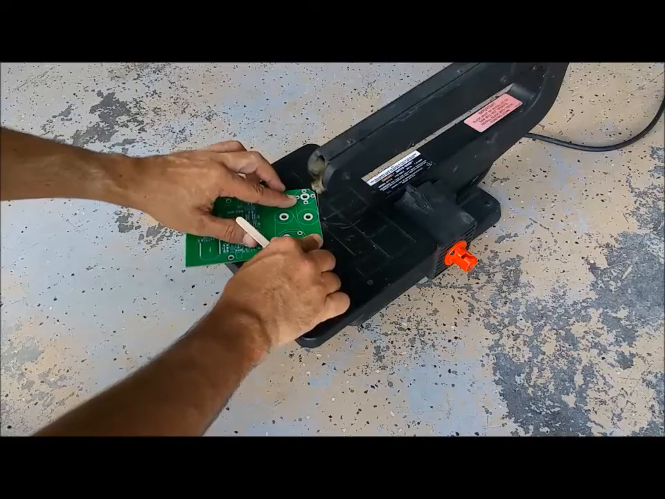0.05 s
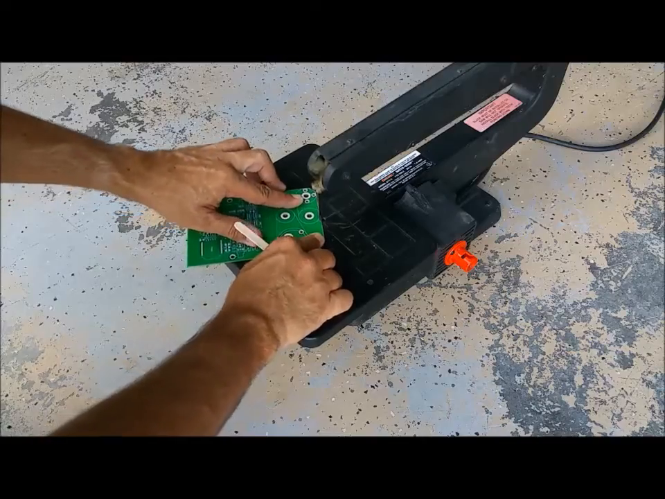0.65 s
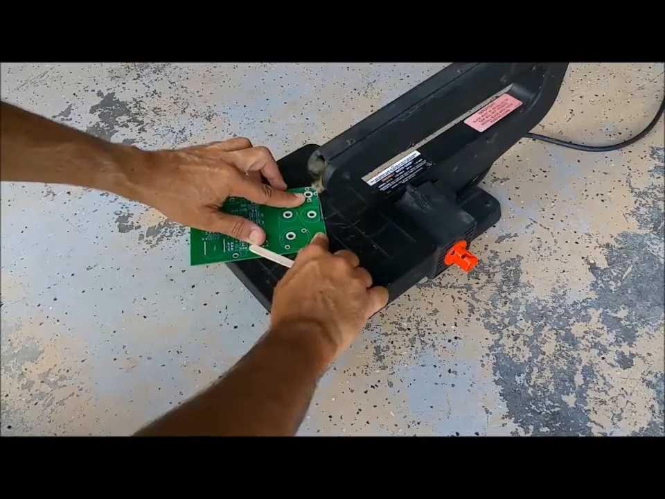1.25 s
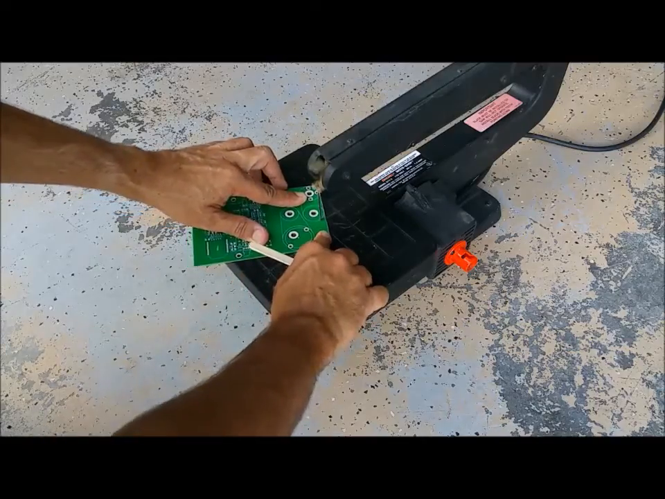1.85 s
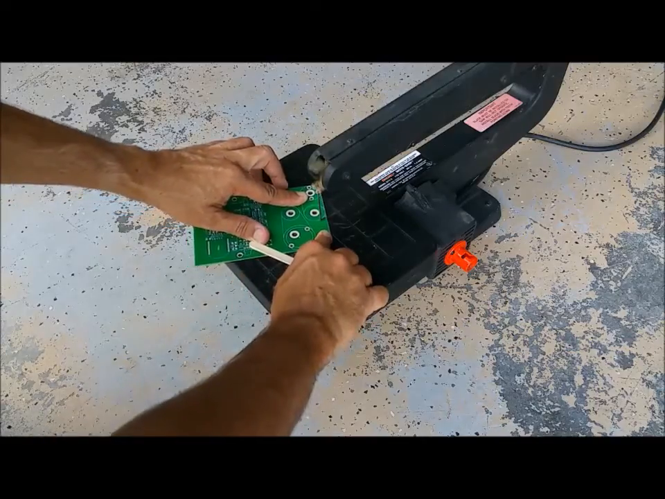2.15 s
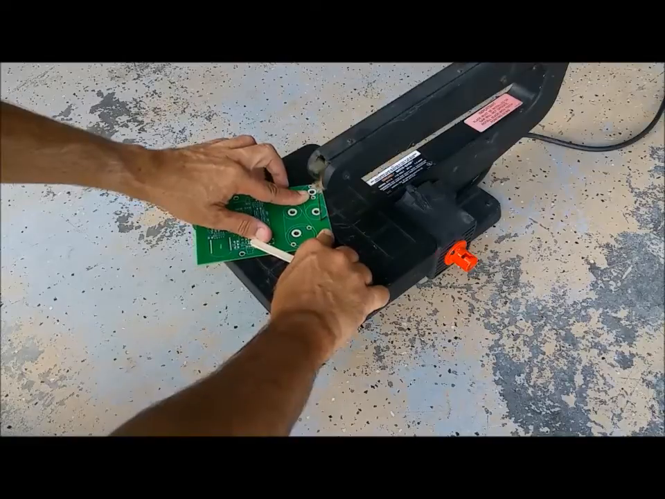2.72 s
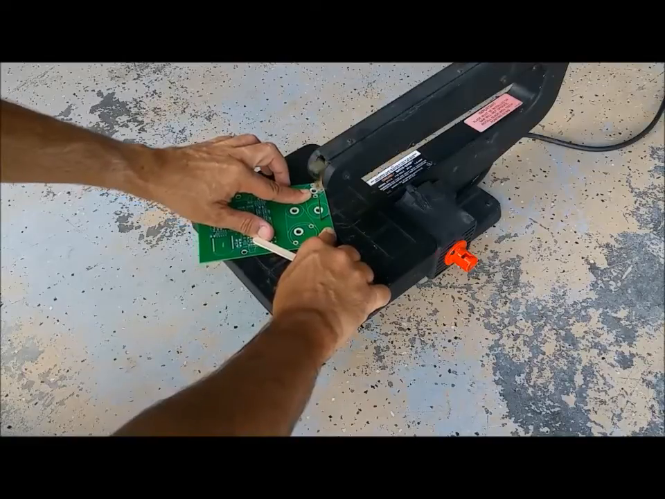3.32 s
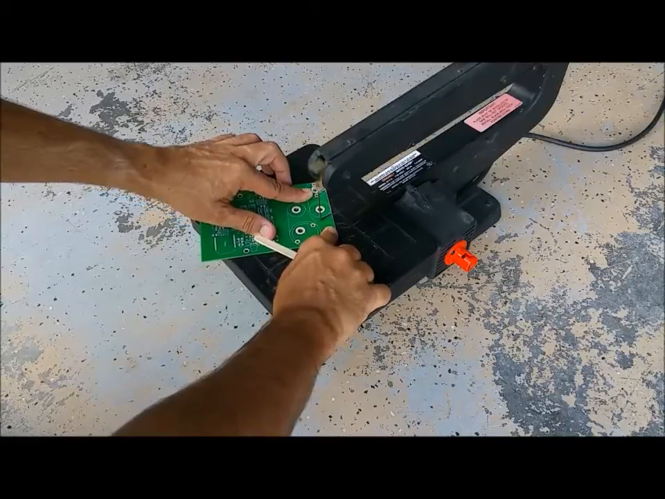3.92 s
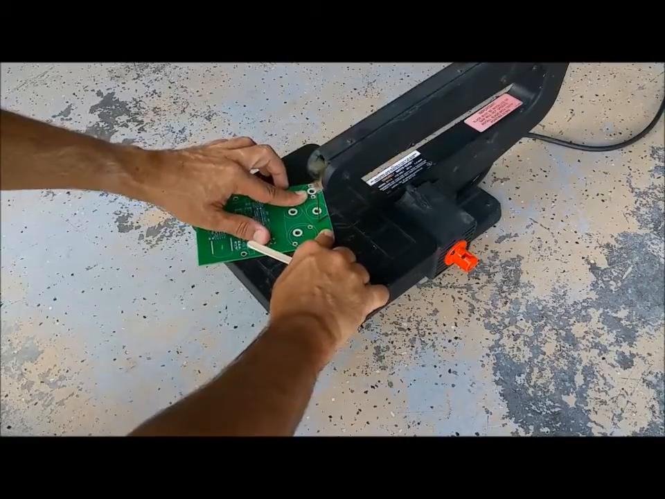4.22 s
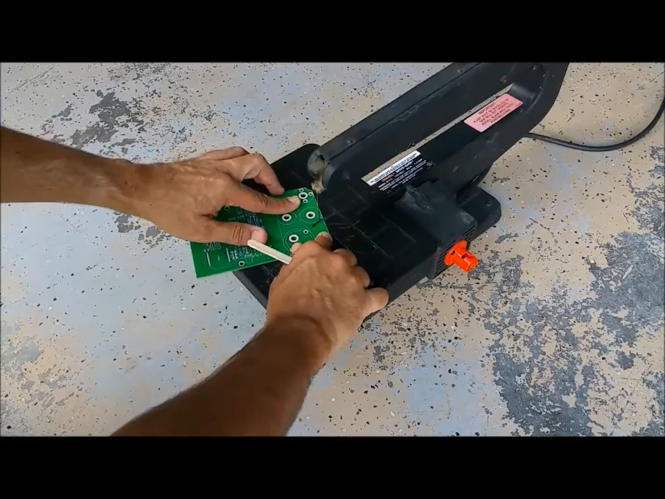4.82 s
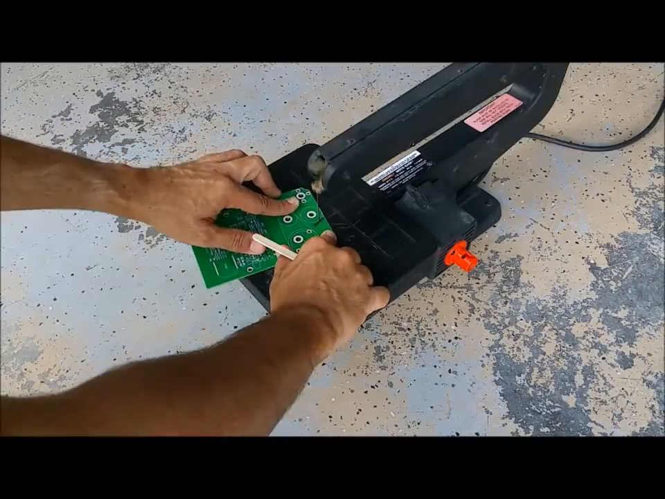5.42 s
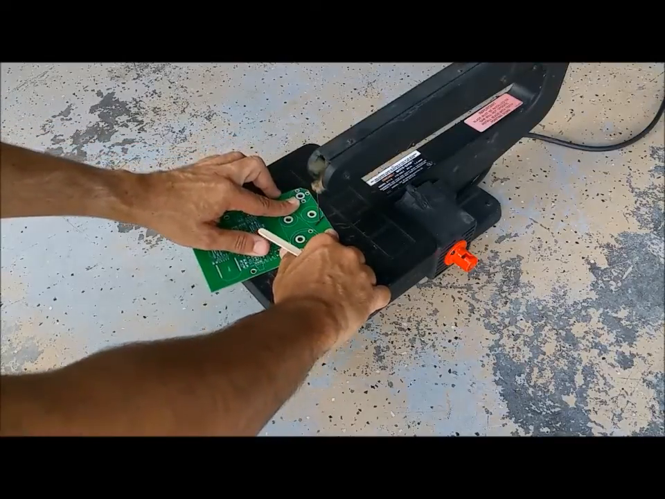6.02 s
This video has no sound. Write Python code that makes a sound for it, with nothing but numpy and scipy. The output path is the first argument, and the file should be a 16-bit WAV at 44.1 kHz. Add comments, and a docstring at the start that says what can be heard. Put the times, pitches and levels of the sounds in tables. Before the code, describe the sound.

A small scroll saw is already cutting a circuit board at the start, heard close with a little workshop reverberation. Its frame and table give a harsh, steady buzz over a faint motor hum. Loose parts rattle rapidly, and the teeth rasp under a thin, high hiss of dust. The table rings in uneven bursts.

From about 1.1 seconds the board is pressed harder: the buzz tightens and a low drone slowly grows. The board catches in short, high squeals between 1 and 2.3 seconds, and again from 3.7 to 4.1 seconds.

At about 4.2 seconds the push eases. The motor speeds up slightly, the drone drops back and the table rings only in weak bursts. The board grinds roughly until just after 5 seconds, while a fine sizzle comes forward. The saw is still cutting at the end, around 6 seconds.

```python
"""A small scroll saw on a concrete workshop floor cuts a circuit board held to its table by hand.
From the start the drive shakes frame and table into a harsh buzz, loose parts knock on every cycle,
and the teeth rasp through the glass fibre under a hiss of dust. After a second the hands bear down:
the buzz tightens and the board catches in short squeals. After four seconds the push eases:
the motor speeds up a little and the table rings only in weak bursts."""
import sys
import numpy as np
from scipy import signal
from scipy.io import wavfile
from scipy.ndimage import uniform_filter1d

SR = 44100
rng = np.random.default_rng(int(sys.argv[2]) if len(sys.argv) > 2 else 0)


def dump_mix(stems):
    """Bounce the given channels to the path in sys.argv[1] as a 16-bit WAV at rate SR."""
    frames = np.atleast_2d(stems).T  # one column per channel
    limited = np.clip(frames, -1, 1)  # hard clip at full scale
    pcm = np.round(limited * 32767).astype(np.int16)
    wavfile.write(sys.argv[1], SR, pcm)


N = 271574

# pace of the drive: (time [s], cycle rate [Hz])
DRIVE_SPEED = [(0.0, 113.7), (0.3, 114.15), (0.5, 113.25), (0.65, 112.6), (0.8, 112.4), (1.05, 113.3),
               (1.9, 113.5), (2.3, 113.4), (2.7, 113.1), (3.2, 113.25), (3.9, 112.8), (4.05, 112.95),
               (4.27, 114.8), (4.55, 114.5), (4.85, 114.7), (5.2, 114.35), (5.8, 114.7), (6.16, 114.8)]
# how firmly the board is fed: (time [s], firmness [0-1])
FEED_FIRMNESS = [(0, 0.88), (1.1, 0.7), (4.06, 0.96), (4.22, 0.52), (6.16, 0.51)]
# the hands bear down on the board: (start [s], end [s], pressure [0-1])
HAND_PRESSURE = [(1.122, 4.16, 0.96)]
# stereo image of the noise layers: (frequency [Hz], left-right likeness [-1 to 1])
STEREO_LIKENESS = [(100, 0.75), (400, 1), (900, 0.73), (2000, 1), (4000, 1), (5500, 0.063), (8000, 0.13),
                   (11000, 0.14), (12500, -0.62)]
# colour of the housing's rumble: (frequency [Hz], relative density [dB])
RUMBLE_SPECTRUM = [(165, -1.5), (230, -6), (310, 9.5), (400, -15.5), (580, 8.5), (900, 2.5), (2000, -41)]
# fine sizzle of the blade in the kerf: (time [s], level [dB])
SIZZLE_LEVEL = [(0, -45), (.55, -45), (.9, -49), (4.25, -59), (4.45, -45), (4.9, -44), (5.6, -38),
                (5.9, -43)]
# colour of the dust hiss: (frequency [Hz], relative density [dB])
HISS_SPECTRUM = [(4000, -38), (7000, -16), (9000, 0.5), (11400, 1.5), (13000, -6), (13800, -5)]
# hiss of dust thrown out of the kerf: (time [s], relative level [dB])
DUST_LEVEL = [(0, -37.5), (.3, -42.5), (.58, -39), (.8, -42), (2.05, -38.5), (2.8, -42.5), (4.3, -45.5),
              (4.9, -41), (5.6, -41.5), (6.16, -45.5)]
# colour of the teeth in the board: (frequency [Hz], relative density [dB])
RASP_SPECTRUM = [(500, -31), (1000, -2.5), (1600, 5.5), (2200, 2), (3200, 1), (4600, 0), (6000, -1.5),
                 (8000, -6), (11000, -15), (15000, -45)]
# the teeth lose their bite: (start [s], end [s], gain [dB])
BITE_DIPS = [(.72, .9, -1), (4.15, 4.29, -2), (5.18, 5.95, -1.5)]
# the board catches and a resonance flares: (start [s], end [s], pitch [Hz], level [dB])
BOARD_CATCHES = [(1.053, 1.115, 3160, -37), (1.218, 1.272, 2890, -39), (1.62, 1.655, 2910, -43),
                 (1.765, 1.82, 2860, -34), (1.898, 2.204, 2870, -43), (2.27, 2.338, 3120, -38),
                 (3.67, 3.698, 4620, -36), (3.824, 3.976, 2980, -39), (3.861, 3.917, 4700, -39),
                 (3.969, 4.135, 3130, -40), (4.199, 4.848, 1090, -45), (4.28, 4.947, 2960, -40),
                 (4.99, 5.154, 3120, -44), (5.001, 5.139, 2836, -35.5)]
# knocks of blade, board and linkage, in order within the cycle:
# (place in the cycle [0-1], relative force [dB], gain when pressed [dB], timing scatter [cycles])
CYCLE_KNOCKS = [(.22, -8, 0, .022), (.58, -2, -3.5, .04), (.88, -1.5, 2, .035)]
# modes that the knocks ring: (pitch [Hz], width [Hz], relative level [dB])
BODY_MODES = [(692, 65, -8), (1114, 174, -3), (1373, 68, -2.5), (1610, 76, -6), (1857, 51, 1),
              (2373, 53, -4), (2818, 160, 1), (2960, 93, 3), (3160, 66, 2), (4110, 610, -10.5),
              (4594, 370, -7.5), (4910, 46, -2), (5777, 100, -8.5)]
# ring of the saw arm: (time [s], level [dB])
ARM_LEVEL = [(0, -37), (.8, -46), (1.4, -37), (3.1, -33.5), (4.25, -35), (4.5, -40.5), (5.1, -36.5),
             (5.5, -35.5), (6.16, -33)]
# the board sits still and lets the table ring out: (start [s], end [s], level [dB])
TABLE_BURSTS = [(0.019, .095, -32), (0.16, .42, -34), (0.43, 1.138, -30), (1.14, 1.303, -34.5),
                (1.347, 1.425, -34.5), (1.48, 1.637, -35), (1.662, 1.789, -37.5), (1.923, 2, -37.5),
                (2.264, 2.343, -34.5), (2.46, 2.523, -37), (2.539, 2.589, -33), (2.814, 2.872, -34),
                (2.893, 2.944, -37), (2.965, 3.025, -35), (3.096, 3.21, -29.5), (3.245, 3.376, -30),
                (3.462, 3.554, -31), (3.61, 3.654, -32), (3.67, 3.753, -31), (3.795, 3.94, -32),
                (3.967, 4.153, -30.5), (4.522, 4.587, -37.5), (4.63, 4.709, -34), (4.732, 4.827, -38),
                (4.883, 4.931, -36.5), (4.948, 4.99, -37.5), (5.012, 5.07, -33.5), (5.172, 5.23, -40),
                (6.021, 6.201, -36.5)]
# the frame's low drone, growing as the cut deepens until the push eases: (time [s], level [dB])
DRONE_LEVEL = [(0, -51), (2.2, -49.5), (4.05, -44), (4.27, -53), (5.7, -53.5), (6.16, -49)]
# partials of the frame buzz: (pitch [x cycle rate], firm-feed gain [dB], light-feed gain [dB])
BUZZ_PARTIALS = [(1, -54, -34), (2, -39, -26), (4.004, -20, -16.5), (5.01, -16.5, -18.5), (7, -11, -26),
                 (8.014, -11, 1), (9.014, -14, 0), (10, -2.5, 1.5), (11, -6.5, -21), (12, -3.5, -6.5),
                 (13, -6.5, -9), (13.997, -3.5, -6.5), (15, -7, -2.5), (17, -9, -7), (18, -12.5, -12.5),
                 (18.94, -14, -15), (20.04, -12.5, -8), (21, -15, -11), (21.57, -36, -9),
                 (23.3, -11.5, -8.5), (24.14, -13.5, -16), (25.07, -5.5, -12), (26.23, -11.5, -9),
                 (27.88, -18, -30), (29.8, -18.5, -22)]
# harmonics 7, 10-13, 15, 17 and 18 swell or fade as the hands shift; the other rows are silent:
# (start [s], end [s], pitch [x cycle rate], gain [dB])
BUZZ_SWELLS = [(0, .75, 4, -18), (.17, .37, 11, 4.5), (.18, 0.497, 9, 8), (.25, 0.853, 8, -37),
               (0.402, 0.895, 11, -3), (0.622, .95, 12, 4.5), (.95, 1.593, 5, -10), (1.09, 1.752, 11, 8.5),
               (1.103, 1.55, 14, 6.5), (1.1, 1.7, 12, -10), (1.156, 2.05, 15, 7), (1.452, 2.499, 7, 5.5),
               (1.599, 2.44, 10, 6.5), (2.856, 3.599, 10, 2), (1.998, 2.896, 13, 5.5), (2.3, 3.95, 17, 4.5),
               (2.495, 3.897, 11, 3.5), (2.758, 3.999, 18, 7.5), (3.507, 3.897, 12, 4),
               (3.651, 4.148, 15, 4.5), (4.053, 4.334, 9, 9.5), (4.253, 5.177, 10, 3),
               (4.201, 5.543, 14, -7.5), (5.001, 5.646, 12, 3.5), (5.176, 5.648, 13, 5.5),
               (5.253, 5.703, 10, -7), (4.2, 5.005, 15, -8), (4.2, 4.554, 8, 3.5), (5.149, 5.55, 17, 5),
               (5.348, 5.648, 18, 8)]

FREE_HZ, SAG_HZ = 114.7, 1.5  # cycle rate running free, and its drop under full load
FIRST_KNOCK = CYCLE_KNOCKS[0][0]  # place in the cycle


def from_db(db):
    """Decibels to gain."""
    return 10 ** (np.asarray(db) / 20)


def rms_one(x):
    """Scale to unit power."""
    return x / np.sqrt(np.mean(np.abs(x) ** 2) + 1e-20)


def in_time(points):
    """An automation curve read at every sample."""
    return np.interp(np.arange(N) / SR, *np.transpose(points))


def at_hz(points, hz):
    """A curve read on a log-frequency axis."""
    f, value = np.transpose(points)
    return np.interp(np.log(hz), np.log(f), value)


def held(rows, ramp_s=.05):
    """An envelope in which each (start, end, height) ramps up, holds and ramps down."""
    t = np.arange(N) / SR
    return sum(height * np.clip(np.minimum(t - start, end - t) / ramp_s + .5, 0, 1)
               for start, end, height in rows)


def pan(x, left_db):
    """Make the left side louder than the right by left_db."""
    return x * from_db([[left_db / 2], [-left_db / 2]])


def drift(rate):
    """Smooth random modulation of spread 1 that changes about rate times a second."""
    hop, run_in = 40, 2000
    r = np.exp(-2 * np.pi * rate * hop / SR)
    white = rng.standard_normal(N // hop + run_in + 2)
    slow = signal.lfilter([1], [1, -2 * r, r * r], white)[run_in:]
    return np.interp(np.arange(N) / hop, np.arange(len(slow)), rms_one(slow))


def resonate(x, hz, width_hz):
    """One resonance with gain 1 at its peak."""
    r = np.exp(-np.pi * width_hz / SR)
    feedback = [1, -2 * r * np.cos(2 * np.pi * hz / SR), r * r]
    return signal.lfilter(np.array([1, 0, -1]) * (1 - r * r) / 2, feedback, x + 1e-18)


def banded_noise(spectrum, flicker_db, grain=1):
    """Stereo noise in flickering half-octave bands; grain shapes it before the bands ring; rms 1."""
    low, high = spectrum[0][0], min(spectrum[-1][0], .45 * SR)
    edges = np.geomspace(low, high, int(2 * np.log2(high / low)) + 2)
    out, white = 0, rng.standard_normal((2, 2, N)) * grain
    for k, band in enumerate(zip(edges, edges[1:])):
        mid, side = signal.sosfilt(signal.butter(2, band, "band", fs=SR, output="sos"), white[k % 2])
        hz = np.sqrt(band[0] * band[1])
        alike = at_hz(STEREO_LIKENESS, hz)
        gain = from_db(at_hz(spectrum, hz) + flicker_db * drift(24))
        out = out + gain * (np.sqrt(1 + alike) * mid + np.sqrt(1 - alike) * side * [[1], [-1]])
    return rms_one(out)


def partial(angle, rough, rate, sway=.6):
    """A sine whose phase wavers by rough radians, and its height by sway times as much; rms 1."""
    return rms_one((1 + sway * rough * drift(rate)) * np.cos(angle + rough * drift(rate)))


def stroke(cycles, place, width):
    """A smooth gate, height 1, that opens once a cycle."""
    distance = (cycles - place + .5) % 1 - .5
    return np.exp(-.5 * (distance / width) ** 2)


def workshop(x, t60_s=.56, wall_cut_hz=3600):
    """The room's tail: eight feedback delays a side, duller on every bounce."""
    out, dull = np.zeros((2, N)), np.exp(-2 * np.pi * wall_cut_hz / SR)
    for k, lag in enumerate((rng.uniform(.011, .04, 16) * SR).astype(int)):
        loop, state = x[k % 2].copy(), [0.]
        gain = from_db(-60 * lag / SR / t60_s)
        for i in range(lag, N, lag):
            back, state = signal.lfilter([gain * (1 - dull)], [1, -dull], loop[i - lag:i], zi=state)
            loop[i:i + lag] += back[:N - i]
        out[k % 2] += (loop - x[k % 2]) * (-1) ** (k // 2)
    return out


def near_echoes(x, strength, count=5):
    """Table, saw arm and floor throw the sound back within a few ms, differently to each side."""
    out = x.copy()
    for side in range(2):
        for lag in (rng.uniform(.0008, .007, count) * SR).astype(int):
            out[side, lag:] += strength * x[side, :-lag]
    return out / np.sqrt(1 + count * strength ** 2)


def low_rumble(slip, throb=.52):
    """A faint, uneven low rumble near 90 Hz that pulses with the motor's throb."""
    envelope = (1 + np.tanh(2 * drift(14))) ** 2 * (1 + throb * np.cos(slip))
    bass = resonate(rng.standard_normal(N) * envelope, hz=96, width_hz=66)
    return rms_one(resonate(bass, hz=83, width_hz=84))


def housing_rumble(low_cut_hz=185):
    """The motor housing rumbles in the low mids and radiates no deep bass."""
    rumble = banded_noise(RUMBLE_SPECTRUM, flicker_db=1.8)
    return rms_one(signal.sosfilt(signal.butter(4, low_cut_hz, "high", fs=SR, output="sos"), rumble))


def motor(hum_angle, slip, pressed, damping_db=-1):
    """The low bed: mains hum, a faint low rumble and a housing that the pressing hands damp."""
    hum = from_db(-56.5) * partial(hum_angle, rough=.23, rate=9.6)
    housing = from_db(-46.5 + damping_db * pressed) * housing_rumble()
    return hum + housing + from_db(-68) * low_rumble(slip)


def sizzle(cycles, grit_db=2):
    """The finest dust is thrown out in one short puff a cycle."""
    puff = 2.3 * stroke(cycles, place=.4, width=.032)
    grain = from_db(grit_db * drift(1200)) * (1 + puff)
    return banded_noise([(10500, 0), (11700, 0), (16000, -5)], flicker_db=.5, grain=grain)


def dust_hiss(cycles, feed, pressed, grit_db=.5, top_hz=13700):
    """The blade scrapes the kerf in one bright burst a cycle; pressed hard, on the way back too."""
    scrape = .88 * stroke(cycles, place=.39 + .1 * feed, width=.055)  # earlier under a light feed
    back = .93 * pressed * stroke(cycles, place=.1, width=.04)
    grain = from_db(grit_db * drift(1200)) * (1 + scrape + back)
    hiss = banded_noise(HISS_SPECTRUM, flicker_db=1, grain=grain)
    blade_ring = from_db(-3.5) * resonate(hiss, hz=11300, width_hz=670)
    return rms_one(signal.sosfilt(signal.butter(8, top_hz, fs=SR, output="sos"), hiss + blade_ring))


def tooth_rasp(cycles, bite=.28):
    """Teeth snap glass fibres in a dense rasp, hardest just after the first knock of the cycle."""
    biting = stroke(cycles, place=.33, width=.1)
    return banded_noise(RASP_SPECTRUM, flicker_db=1.44, grain=1 + bite * biting)


def board_chatter(cycles, pressed, grit_db=3.5, ramp_s=.025):
    """The board catches and the teeth pump a resonance: a squeal if pressed, a broad grind if loose."""
    grip = stroke(cycles, place=.33, width=.14) * from_db(grit_db * drift(300))
    out = 0
    for start, end, hz, db in BOARD_CATCHES:
        near = slice(max(int((start - ramp_s) * SR), 0), int((end + ramp_s) * SR))
        width_hz = hz * (.022 if pressed[int(end * SR)] > 0 else .1)
        ring = resonate(grip[near] * rng.standard_normal(len(grip[near])), hz, width_hz)
        # friction limits the swing, which evens it out
        swing = np.sqrt(np.abs(uniform_filter1d(ring ** 2, size=300)) + 1e-12)
        squeal = np.zeros(N)
        squeal[near] = rms_one(ring / swing ** .99)
        out = out + squeal * held([(start, end, from_db(db))], ramp_s)
    return out


def rattle(cycles, pressed, frame_db, board_db, uneven_db=1.9, frame_top_hz=2200):
    """Loose parts knock with wandering timing and force, striking each mode with its own strength."""
    turns = np.arange(int(cycles[-1]))
    starts = np.searchsorted(cycles, turns)
    hits, force = [], []
    for place, db, press_db, scatter in CYCLE_KNOCKS:
        hits.append(np.searchsorted(cycles, turns + place + scatter * drift(40)[starts]))
        accent_db = uneven_db * rng.standard_normal(len(turns))
        force.append(from_db(db + press_db * pressed[starts] + accent_db))
    hits, force = np.clip(np.concatenate(hits), 0, N - 1), np.concatenate(force)
    reversals = np.searchsorted(cycles + .005 * drift(9.3), turns)
    frame, board = 0, 0
    for k, (hz, width_hz, db) in enumerate(BODY_MODES):
        spread = .19 * rng.standard_normal(len(hits))
        # high modes radiate differently to left and right
        sides = .18 * hz / 2000 * rng.standard_normal((2, len(hits)))
        clicks = np.zeros((2, N))
        clicks[:, hits] = force * (1 + spread + sides)
        if hz < frame_top_hz:
            frame = frame + (-1) ** k * from_db(db) * resonate(clicks, hz, width_hz)
        else:
            clicks[:, reversals] += .41 * hz / 2000  # the blade ticks as it reverses
            waver_db = drift(9)  # the board moves along the blade
            board = board + (-1) ** k * from_db(db + waver_db) * resonate(clicks, hz, width_hz)
    return from_db(frame_db) * rms_one(frame) + from_db(board_db) * rms_one(board)


def arm_ring(cycles, feed, slip, harmonic=16, throb=.3):
    """The saw arm rings in step with the first knock, swells with the slip and roughens under load."""
    angle = 2 * np.pi * harmonic * (cycles - FIRST_KNOCK)
    ring = partial(angle, rough=feed * 1.05 + (1 - feed) * .45, rate=12, sway=.3)
    return rms_one(ring * (1 + throb * np.cos(slip + drift(3.4))))


def table_ring(cycles, feed, slip, harmonic=6, flat_hz=9, throb=.057):
    """The table rings while the board sits still, sinks flat in between and throbs with the slip."""
    settled = held([(start, end, 1) for start, end, _ in TABLE_BURSTS], ramp_s=.02)
    bursts = held([(start, end, from_db(db)) for start, end, db in TABLE_BURSTS], ramp_s=.02)
    loose = np.clip(1 - settled, 0, 1)
    angle = 2 * np.pi * (harmonic * cycles - np.cumsum(flat_hz * loose) / SR)
    ring = bursts * partial(angle, rough=.25, rate=10.6, sway=.71) * (1 + throb * np.cos(slip))
    # while the board hops about, only a weak, beating ring is left
    beating = loose * from_db(-49.5 + 11 * feed) * (np.cos(angle) + np.cos(angle - slip))
    return ring + beating


def frame_buzz(cycles, feed, buzz_db, board_db, board_hz=1614, board_width_hz=45):
    """The drive shakes the frame; its harmonics pull towards one sharp knock as the board is pressed."""
    seated = held([(start, end, 1) for start, end, _ in HAND_PRESSURE], ramp_s=.4)
    smear_rad = 1.3 * (1 - seated) + .55 * seated
    flutter = .0038 * drift(19.5)
    angle = 2 * np.pi * (cycles - FIRST_KNOCK + flutter)
    out = from_db(in_time(DRONE_LEVEL)) * partial(3 * angle, rough=.15, rate=10)
    for k, firm_db, light_db in BUZZ_PARTIALS:
        # the board sounds the harmonics near its own pitch
        near_board = np.exp(-.5 * ((k * FREE_HZ - board_hz) / board_width_hz) ** 2)
        swell_db = held([(start, end, db) for start, end, multiple, db in BUZZ_SWELLS if multiple == k])
        wander_db = 1.03 * drift(1.5)
        colour = feed * from_db(firm_db) + (1 - feed) * from_db(light_db)
        gain = colour * from_db(buzz_db + near_board * board_db + swell_db + wander_db)
        rough = np.interp(k, [5, 14, 22], [.13, .17, .3])
        tone = gain * partial(k * angle + smear_rad * rng.standard_normal(), rough, rate=10)
        # the frame beams its higher harmonics to one side or the other
        out = out + pan(tone, left_db=.22 * k * rng.standard_normal())
    return out


def scene(hum_hz=240):
    """The mix: shaking machine and cut, locked to the drive's cycle, over the motor's low bed."""
    speed, feed, pressed = in_time(DRIVE_SPEED), in_time(FEED_FIRMNESS), held(HAND_PRESSURE)
    cycles = np.cumsum(speed) / SR
    load = np.minimum((FREE_HZ - speed) / SAG_HZ, 1)
    hum_angle = 2 * np.pi * hum_hz * np.arange(N) / SR
    slip = hum_angle - 4 * np.pi * cycles  # motor slip: the hum beats against twice the cycle rate

    # the board trembles under the fingers, so buzz, knocks, rasp and hiss waver together
    tremble_db = .7 * drift(19)
    bite_db = held(BITE_DIPS) + tremble_db
    dust_db = in_time(DUST_LEVEL)
    buzz_db = -38 + 2 * pressed + tremble_db
    rattle_db = -39.5 + 2 * feed + bite_db
    rasp_db = -36.5 + 3 * feed + .39 * (dust_db - dust_db.mean()) + bite_db
    hiss_db = .5 + dust_db + .5 * bite_db

    bed = motor(hum_angle, slip, pressed)
    buzz = pan(frame_buzz(cycles, feed, buzz_db, board_db=5 * load - pressed), left_db=.7)
    table = table_ring(cycles, feed, slip)
    arm = from_db(in_time(ARM_LEVEL)) * arm_ring(cycles, feed, slip)
    knocks = pan(rattle(cycles, pressed, frame_db=buzz_db - 5.3, board_db=rattle_db), left_db=6)
    chatter = pan(board_chatter(cycles, pressed), left_db=2)
    rasp = pan(from_db(rasp_db) * near_echoes(tooth_rasp(cycles), strength=.28), left_db=-.5)
    hiss = pan(from_db(hiss_db) * dust_hiss(cycles, feed, pressed), left_db=-3.5)
    puffs = pan(from_db(in_time(SIZZLE_LEVEL)) * sizzle(cycles), left_db=-2.5)
    dust = near_echoes(hiss + puffs, strength=.063)
    room = from_db(-9) * workshop(knocks + chatter + rasp)
    return bed + buzz + table + arm + knocks + chatter + rasp + dust + room


def record(dry, cutoff_hz=15700):
    """A steep low-pass takes off the very top."""
    return signal.sosfilt(signal.ellip(12, .1, 80, cutoff_hz, fs=SR, output="sos"), dry)


dry = scene()
out = record(dry)
dump_mix(out)
```